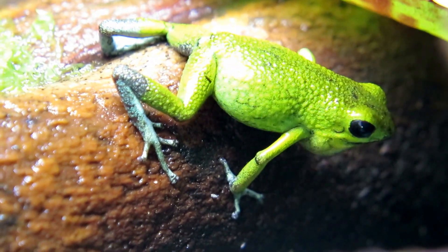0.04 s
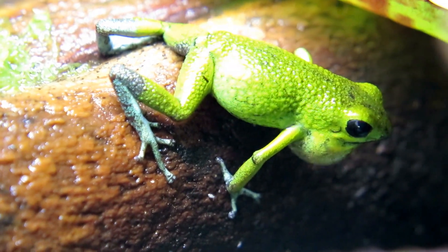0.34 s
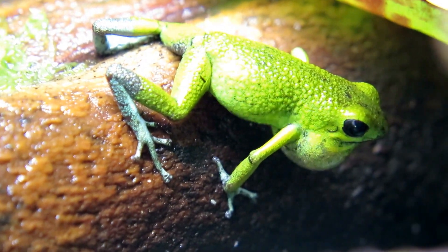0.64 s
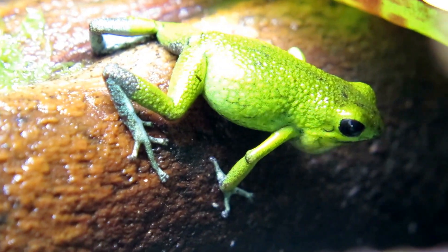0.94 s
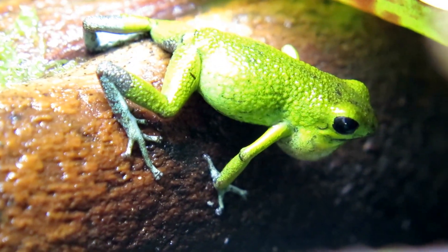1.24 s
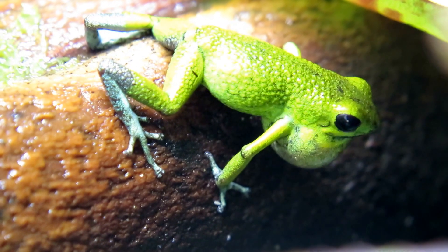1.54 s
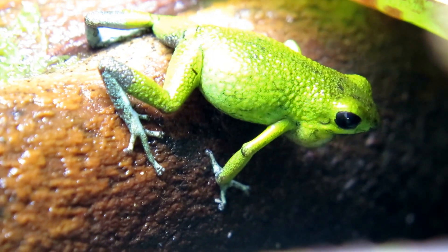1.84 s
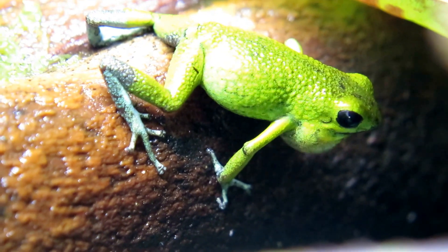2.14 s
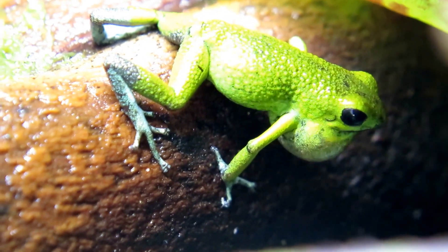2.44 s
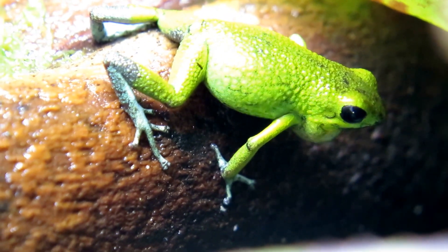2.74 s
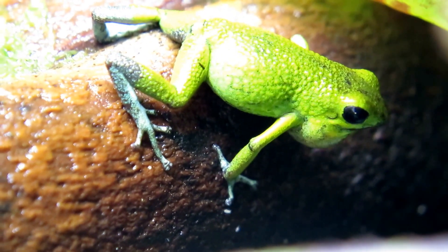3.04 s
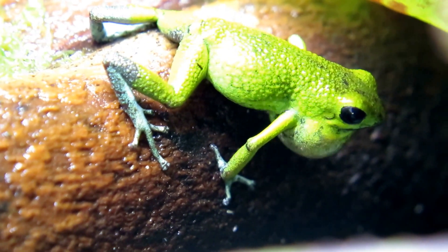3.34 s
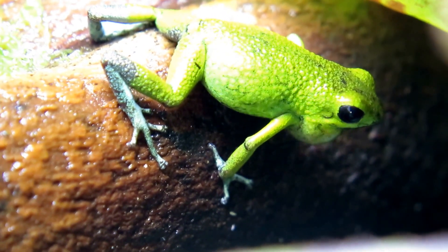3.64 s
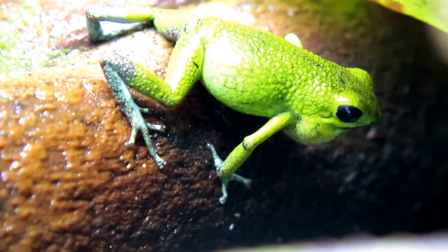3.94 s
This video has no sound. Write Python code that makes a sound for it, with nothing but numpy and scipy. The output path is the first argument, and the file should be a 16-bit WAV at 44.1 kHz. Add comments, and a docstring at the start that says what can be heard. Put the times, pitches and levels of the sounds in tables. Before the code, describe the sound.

Four evenly spaced, high rasping frog calls sound above a soft motor drone.

```python
"""A room hums: a distant electric motor wavers over soft ventilation air.
Then a tiny frog on a wet log gives four buzzing calls, close to a camera.
Each call is a train of sharp pulses ringing its vocal sac, whose pitch climbs as it fills.
The camera's gain control holds the calls down, so the hum sinks and swells back after each."""
import sys
import numpy as np
from scipy import signal
from scipy.fft import rfft, irfft
from scipy.io import wavfile
from scipy.ndimage import uniform_filter1d, minimum_filter1d

SR = 44100
rng = np.random.default_rng(int(sys.argv[2]) if len(sys.argv) > 2 else 0)


def wav_record(signal):
    """Record a signal, one row per channel, as 16-bit PCM in the file named by sys.argv[1]."""
    frames = np.transpose(np.atleast_2d(signal))
    bounded = np.clip(frames, -1, 1)
    # unit amplitude maps onto the largest positive 16-bit level
    quanta = np.round(bounded * 32767).astype(np.int16)
    wavfile.write(sys.argv[1], SR, quanta)


N = 176400


def amp(db):
    """Decibels to gain."""
    return 10 ** (np.asarray(db) / 20)


def unit_rms(x):
    """Scales to rms 1."""
    return x / np.sqrt(np.mean(abs(x) ** 2) + 1e-20)


def curve(points, hz):
    """Reads a curve on a log-frequency axis."""
    f, value = np.transpose(points)
    return np.interp(np.log(hz + 1), np.log(f + 1), value)


def envelopes(table, progress):
    """Reads every column of a table at a point in the call, 0 to 1."""
    at, *columns = np.transpose(table)
    return [np.interp(progress, at, column) for column in columns]


def drift(rate_hz):
    """Slow random wandering of rms 1."""
    hz = np.fft.rfftfreq(N, 1 / SR)
    return unit_rms(irfft(rfft(rng.standard_normal(N)) * np.exp(-(hz / rate_hz) ** 2), N))


def minimum_phase(gain):
    """The spectrum of the tightest ring that has this magnitude."""
    log_gain = np.log(np.maximum(gain, 1e-6))
    mirrored = np.concatenate([log_gain, log_gain[-2:0:-1]])
    return np.exp(np.conj(signal.hilbert(mirrored)))[:len(gain)]


# Motor partials: (frequency [Hz], level [dB], waver depth [0-1])
MOTOR_PARTIALS = [(61, -61.5, 0.43), (119.6, -35, 0.2), (180.4, -68, 0.97), (221.7, -52.5, .8),
                  (371.5, -51.5, 0.34), (740, -61, 0.34)]


def motor_hum(waver_hz=8.4):
    """A distant electric motor drones, each partial wavering in level and phase."""
    t = np.arange(N) / SR
    out = np.zeros(N)
    for hz, db, depth in MOTOR_PARTIALS:
        waver = 1 - depth + depth * (drift(waver_hz) + 1j * drift(waver_hz)) / np.sqrt(2)
        tone = np.exp(2j * np.pi * (hz * t + rng.random()))
        out += amp(db) * unit_rms((waver * tone).real)
    return out


# Tone of the air bed: (frequency [Hz], relative level [dB])
AIR_EQ = [(20, -22), (45, -14.5), (80, -4), (120, -5.5), (170, -9), (330, -9), (500, -13), (1000, -16),
          (2000, -23.5), (5000, -27.5), (10000, -34), (15000, -38)]
# Its stereo image: (frequency [Hz], left-right correlation [0-1])
AIR_CORRELATION = [(60, 0.98), (130, 0.72), (280, 0.13), (610, 0.28), (1320, 0.5), (2870, 0.74),
                   (6220, 0.366), (13500, 0.15)]


def ventilation(level_db=-40, flutter_db=1.28, size=2048):
    """A soft bed of moving air, faintly fluttering and nearly mono in the bass."""
    hz, hop = np.fft.rfftfreq(size, 1 / SR), size // 4
    a, b, c, d, flutter = rng.standard_normal((N // hop + 5, len(hz), 5)).T
    flutter = uniform_filter1d(flutter, size=14, axis=0)  # smooth across frequency
    flutter = unit_rms(uniform_filter1d(flutter, size=8, axis=1))  # and over time
    correlation = curve(AIR_CORRELATION, hz)[:, None]
    left = a + 1j * b
    right = correlation * left + np.sqrt(1 - correlation ** 2) * (c + 1j * d)
    spectra = np.array([left, right]) * amp(curve(AIR_EQ, hz)[:, None] + flutter_db * flutter)
    _, air = signal.istft(spectra, nperseg=size, noverlap=size - hop)
    return amp(level_db) * unit_rms(air[:, :N])


# Speed of the buzz: (call progress [0-1], pulse rate in calls 1, 2, 3, 4 [Hz])
BUZZ_RATE = [(0.0, 126.6, 138.7, 148.9, 115.7), (0.04, 104.2, 102.0, 98.0, 101.0),
             (0.09, 136.0, 119.9, 135.4, 121.6), (0.14, 113.4, 135.8, 118.1, 127.3),
             (0.19, 129.0, 130.6, 128.1, 114.2), (0.25, 116.5, 124.2, 119.2, 113.2),
             (0.33, 109.6, 108.6, 111.4, 107.7), (0.42, 122.1, 125.8, 125.7, 118.6),
             (0.5, 124.0, 130.5, 133.2, 129.8), (0.6, 138.3, 133.5, 139.8, 141.2),
             (0.72, 147.1, 149.0, 151.3, 151.9), (0.88, 140.6, 136.1, 138.0, 139.4),
             (0.96, 106.4, 112.2, 104.3, 109.3), (1.0, 207.3, 239.3, 285.2, 278.2)]


def larynx_snaps(start, length, call, jitter=0.02797):
    """The times at which the larynx snaps through one call, each a little early or late."""
    times, slips = [0], rng.standard_normal(200)
    while times[-1] <= length:
        rate_hz = envelopes(BUZZ_RATE, times[-1] / length)[call]
        times.append(times[-1] + 1 / rate_hz)
    gaps = np.diff(times)
    return start + np.array(times[:-1]) + jitter * gaps * slips[:len(gaps)]


# Sweep of the filling sac: (call progress [0-1], main resonance [Hz], main width [Hz],
# upper resonance [Hz], upper width [Hz], upper gain [dB])
SAC_SWEEP = [(0, 3700, 600, 10170, 610, 1), (.2, 4090, 580, 11100, 930, -2),
             (.45, 4396, 380, 11650, 647, -2), (.75, 4653, 272, 12140, 450, -2.5),
             (.95, 4740, 257, 12250, 406, -2)]


def vocal_sac(hz, progress, tuning):
    """The spectrum of the sac's two resonances, which climb and end narrower as it fills."""
    main_hz, main_width, upper_hz, upper_width, upper_db = envelopes(SAC_SWEEP, progress)
    main = 1 / ((tuning * main_hz) ** 2 - hz ** 2 + 1j * hz * main_width)
    upper = amp(upper_db) / ((tuning * upper_hz) ** 2 - hz ** 2 + 1j * hz * upper_width)
    return main + upper


# Cues for the calls: (start [s], length [s], level trim [dB], sac tuning [ratio])
CALL_CUES = [(.2041, .582, 0.6, 0.996), (1.1468, 0.59, 0.3, 1.003), (2.0849, .6015, 1.2, 1.006),
             (3.0474, 0.6, 1.4, 1.007)]
# Swell of the frog's effort: (call progress [0-1], relative level [dB])
CALL_SWELL = [(0, -10.5), (.08, -4.5), (.19, -1), (.35, 0.5), (.55, 8), (.75, 11), (.9, 10.5), (.97, 9.5),
              (1, -6)]
# Tone of throat and body: (frequency [Hz], relative level [dB])
BODY_EQ = [(700, -38), (1600, -28), (2100, -18), (2800, -17), (3030, -7), (3260, -16), (3520, -3),
           (3760, 3), (4020, -4), (4250, -4), (4450, 0), (4700, 0), (4950, -5), (5250, -11), (6100, -9),
           (6700, -14), (8400, -2), (10600, 0), (12100, -4), (12900, -20), (13700, -26), (15000, -38)]
# Tone of the air escaping with each pulse: (frequency [Hz], relative level [dB])
PUFF_EQ = [(1000, -33), (2300, -2.5), (4500, -9), (6200, 5.5), (7000, -1), (8300, -1.5), (9300, -6.5),
           (11500, -1), (13000, -22.5), (15000, -28.5)]


def frog(gain_db=10.5, shimmer_db=.5, pitch_jitter=.005, puff_db=-24.5, puff_decay_s=.0065, size=1024):
    """Every snap of the larynx rings the sac through the body and lets out a puff of air."""
    out, hz, t = np.zeros(N), np.fft.rfftfreq(size, 1 / SR), np.arange(size) / SR
    body = minimum_phase(amp(curve(BODY_EQ, hz)))
    breath = minimum_phase(amp(curve(PUFF_EQ, hz)))
    for call, (start, length, trim_db, tuning) in enumerate(CALL_CUES):
        snaps = larynx_snaps(start, length, call)
        variations, noises = rng.standard_normal((200, 2)), rng.standard_normal((200, size))
        for onset, (force, tension), noise in zip(snaps, variations, noises):
            progress = (onset - start) / length
            sac = vocal_sac(hz, progress, tuning * (1 + pitch_jitter * tension))
            subsample_delay = np.exp(-2j * np.pi * hz / SR * (onset * SR % 1))
            ring = irfft(sac * body * subsample_delay)
            puff = irfft(rfft(noise * np.exp(-t / puff_decay_s)) * breath)
            pulse = ring / np.linalg.norm(ring) + amp(puff_db) * puff / np.linalg.norm(puff)
            db = gain_db + trim_db + envelopes(CALL_SWELL, progress)[0] + shimmer_db * force
            slot = out[int(onset * SR):][:size]
            slot += amp(db) * pulse[:len(slot)]
    return out


# Pan of the direct sound: (frequency [Hz], left minus right [dB])
SPECTRAL_PAN = [(1500, 13.5), (2700, -13.5), (3020, 32.5), (3300, -43.5), (3520, 22), (3930, -3),
                (4200, 20.5), (4600, -5.5), (5400, 16), (5800, -26), (7400, 6), (8100, 7.5), (9200, -9),
                (10400, -4), (11200, 5), (12100, 0), (12600, -40), (13500, 29)]
# Slaps off nearby surfaces: (left delay [ms], right delay [ms], main band [dB], treble [dB])
EARLY_REFLECTIONS = [(2.47, 2.5, -32.5, -5), (3.27, 3.3, -15, -32), (4.44, 4.46, -14.5, -19),
                     (5.31, 10, -25.5, -15.5)]
# Tone of the scatter and room tail: (frequency [Hz], gain [dB])
REVERB_EQ = [(2000, 1), (3700, -4.5), (4250, 8.5), (4700, -1.5), (5300, -2.5), (8000, 6), (12000, 5)]


def room(source, right_mic_delay_ms=.0061, size=32768):
    """The source arrives direct, then off nearby surfaces, then as quick scatter and a faint tail."""
    hz, t = np.fft.rfftfreq(size, 1 / SR), np.arange(size) / SR

    def delay(left_ms, right_ms):
        return np.exp(-2j * np.pi * hz * np.array([[left_ms], [right_ms]]) / 1000)

    pan = np.array([amp(side * curve(SPECTRAL_PAN, hz) / 2) for side in (1, -1)])
    pan /= np.sqrt(np.mean(pan ** 2, axis=0))  # constant power
    paths = delay(0, right_mic_delay_ms) * np.array([minimum_phase(gain) for gain in pan])
    for left_ms, right_ms, main_db, treble_db in EARLY_REFLECTIONS:
        paths += delay(left_ms, right_ms) * amp(curve([(5500, main_db), (10000, treble_db)], hz))
    response = irfft(paths)
    for send_db, t60_s in (-15, .035), (-27, .25):  # scatter, room tail
        tail = rng.standard_normal((2, size)) * amp(-60 * t / t60_s) * (t > .002)  # 2 ms pre-delay
        tail /= np.linalg.norm(tail[0])
        response += irfft(rfft(tail) * amp(send_db + curve(REVERB_EQ, hz)))
    return signal.fftconvolve(source[None], response, axes=1)[:, :N]


def scene():
    """The frog up close in the room, over a bed of hum and air."""
    return room(frog()) + motor_hum() + ventilation()


def record(dry):
    """The camera's gain control ducks on peaks, holds and swells back; then a soft clip and a high cut."""
    slope, hold_s, release_db_per_s, opening_duck_db = .88, .054, 12.5, 5.5
    ceiling, knee, high_cut_hz = .93, 24, 14100
    peak_db = 20 * np.log10(abs(dry).max(0) + 1e-9)
    wanted_duck_db = slope * np.maximum(peak_db, 0)  # threshold at 0 dB
    half_hold = int(hold_s * SR / 2)
    held_db = -minimum_filter1d(-wanted_duck_db, 2 * half_hold + 1, origin=half_hold, mode="nearest")
    release_db = release_db_per_s * np.arange(N) / SR
    # The gain starts low, so the hum also swells before the first call.
    duck_db = np.maximum(np.maximum.accumulate(held_db + release_db), opening_duck_db) - release_db
    ducked = dry * amp(-uniform_filter1d(duck_db, size=128))
    rounded = ducked / (1 + abs(ducked / ceiling) ** knee) ** (1 / knee)
    high_cut = signal.firwin(255, high_cut_hz, window=("kaiser", 8), fs=SR)
    return signal.oaconvolve(rounded, high_cut[None], "same")


dry = scene()
out = record(dry)
wav_record(out)
```